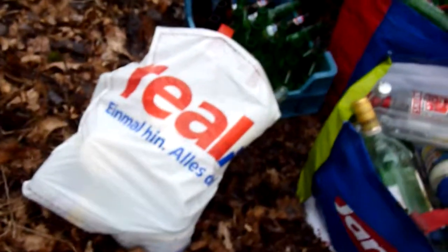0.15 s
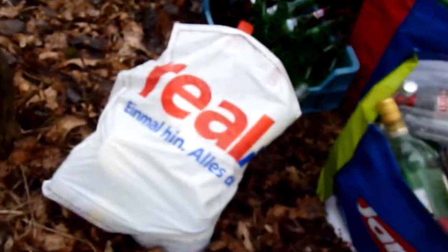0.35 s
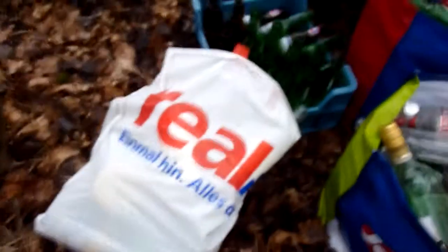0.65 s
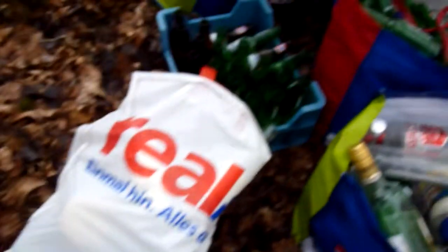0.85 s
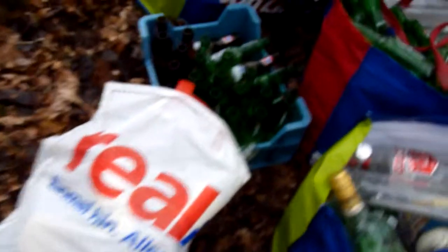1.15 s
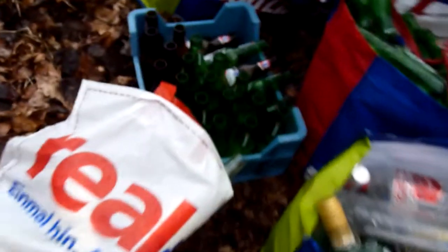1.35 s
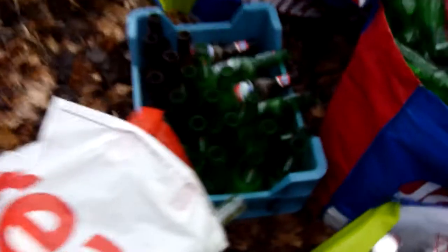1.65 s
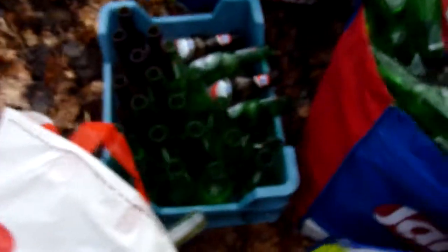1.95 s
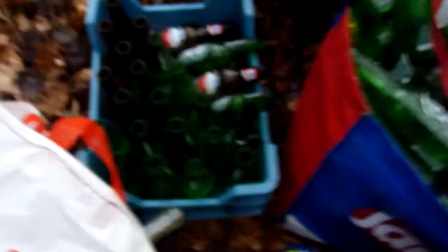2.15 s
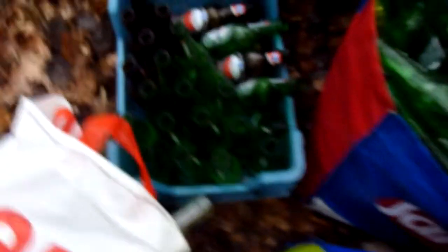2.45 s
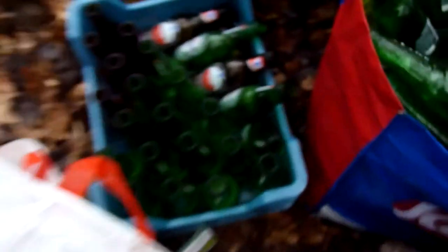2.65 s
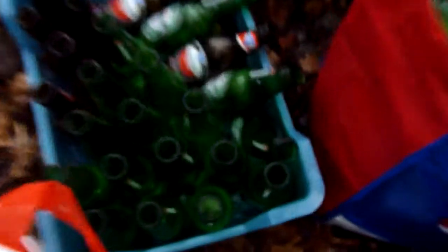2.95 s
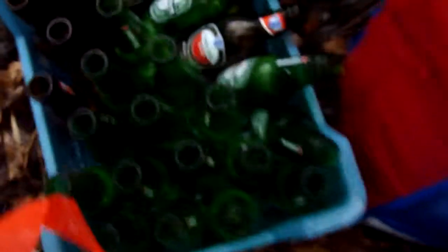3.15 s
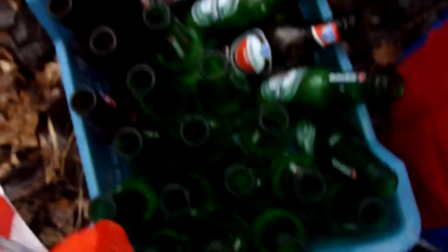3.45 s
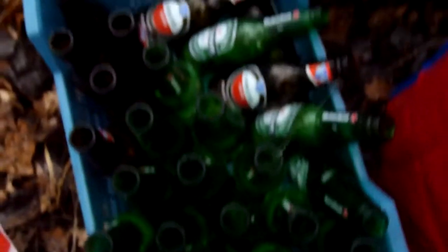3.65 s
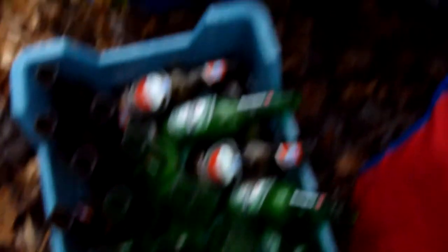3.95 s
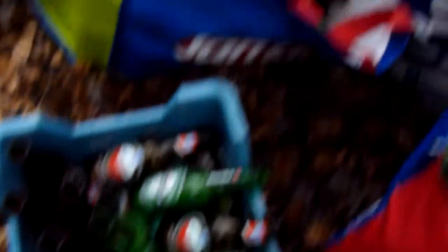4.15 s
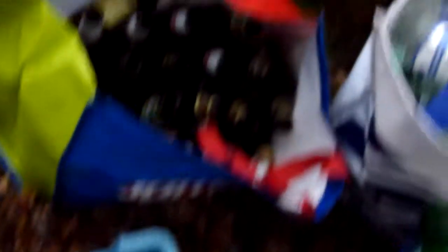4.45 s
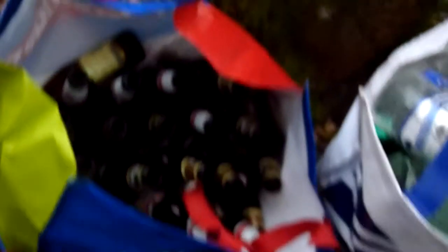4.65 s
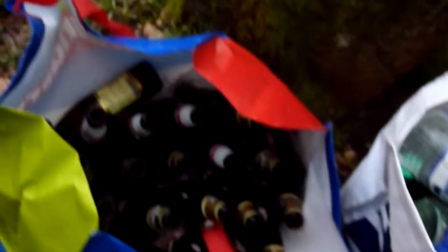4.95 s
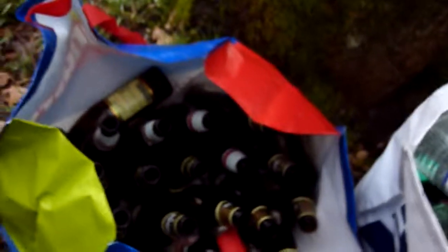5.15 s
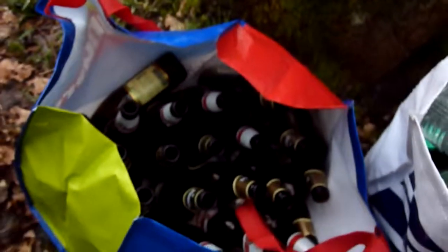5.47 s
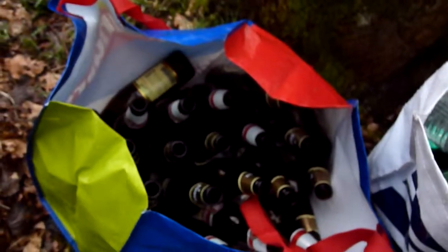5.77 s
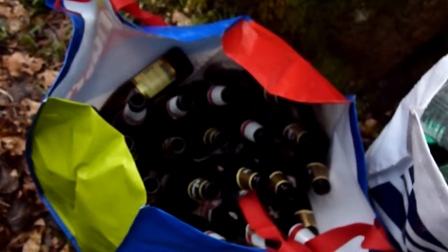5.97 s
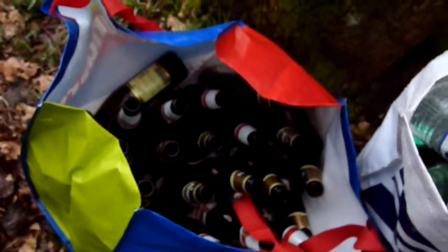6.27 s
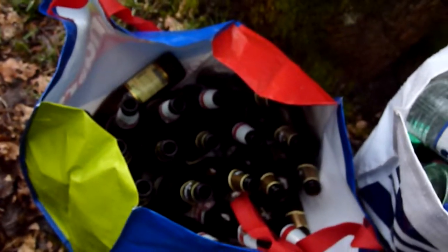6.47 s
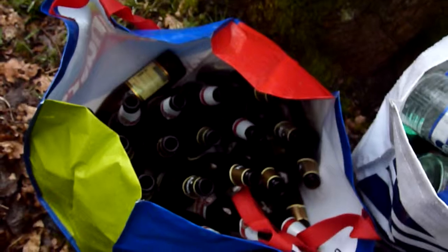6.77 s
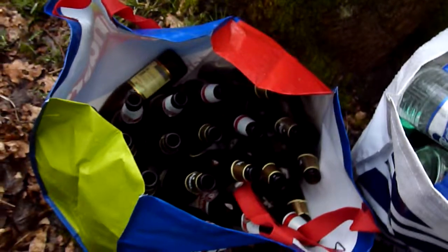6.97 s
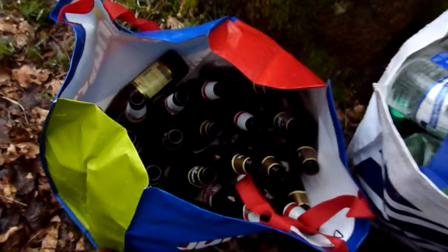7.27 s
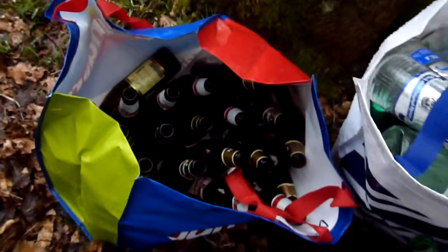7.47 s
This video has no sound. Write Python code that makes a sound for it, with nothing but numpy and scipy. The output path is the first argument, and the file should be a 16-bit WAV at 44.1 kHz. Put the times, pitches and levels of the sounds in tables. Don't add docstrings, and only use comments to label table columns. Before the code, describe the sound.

Light uneven rain and tree drips fall close by on plastic bags, bottles and dry leaves. Soft taps and crisp ticks come first, then a hard burst of drops just after one second. Near two and a half seconds a loud hollow bottle knock rings with a brief glass clink. Afterwards it thins to scattered patter with a few single thuds. Close handheld stereo microphone outdoors, with grainy hiss and a faint low murk behind.

```python
import sys
import numpy as np
from scipy import signal
from scipy.io import wavfile
from scipy.ndimage import uniform_filter1d

SR = 44100
rng = np.random.default_rng(int(sys.argv[2]) if len(sys.argv) > 2 else 0)


def output_pcm(signal):
    pcm = np.clip(np.atleast_2d(signal).T, -1, 1) * 32767
    wavfile.write(sys.argv[1], SR, np.round(pcm).astype(np.int16))


def magnitude_from_level(level_db):
    exponent = np.asarray(level_db, float) / 20
    return 10 ** exponent


N = 336042


def rms_one(x):
    return x / np.sqrt(np.mean(x ** 2) + 1e-20)


def peak_one(x):
    return x / np.max(np.abs(x))


def at_hz(points, hz):
    points = np.array(points)
    return np.interp(np.log(hz), np.log(points[:, 0]), points[:, 1])


def butter(order, edge_hz, kind, x):
    return signal.sosfilt(signal.butter(order, edge_hz, kind, fs=SR, output="sos"), x)


def drift(rate_hz):
    pole = np.exp(-80 * np.pi * rate_hz / SR)
    white = rng.standard_normal(N // 40 + 2002)
    slow = signal.lfilter([1], [1, -2 * pole, pole * pole], white)[2000:]
    return np.interp(np.arange(N) / 40, np.arange(len(slow)), rms_one(slow))


def fade(t60_s, size):
    return magnitude_from_level(-60 * np.arange(size) / SR / t60_s)


def ring(push, hz, t60_s):
    pole, angle = magnitude_from_level(-60 / (t60_s * SR)), 2 * np.pi * hz / SR
    return signal.lfilter([0, np.sin(angle)], [1, -2 * pole * np.cos(angle), pole * pole], push + 1e-18)


def add(out, s, sound, pan_db=0):
    start = round(s * SR)
    panned = sound * magnitude_from_level([[pan_db / 2], [-pan_db / 2]])
    out[:, start:start + sound.shape[-1]] += panned[:, :N - start]


def bands(spectrum, low_hz, high_hz):
    # frequency in Hz, side minus mid in dB.
    width = [(60, -22), (120, -21), (240, -21.5), (480, -18), (950, -15.5), (1890, -7.5), (3770, -1.5),
             (7520, -1.5), (15000, 6.5)]
    edges_hz = np.geomspace(low_hz, high_hz, round(3 * np.log2(high_hz / low_hz)) + 1)
    white = rng.standard_normal((2, 2, N))
    for k, (low, high) in enumerate(zip(edges_hz, edges_hz[1:])):
        mid, side = butter(2, [low, high], "band", white[k % 2])
        hz = np.sqrt(low * high)
        stereo = mid + magnitude_from_level(at_hz(width, hz)) * side * [[1], [-1]]
        yield hz, magnitude_from_level(at_hz(spectrum, hz)) * stereo


def rumble():
    # frequency in Hz, level in dB per Hz.
    murk_colour = [(12, -38), (20, -11), (70, 7.5), (150, -0.5), (344, -17), (400, -2), (520, -32),
                   (880, -120)]
    return magnitude_from_level(-61) * rms_one(sum(sound for hz, sound in bands(murk_colour, 28.0, 244.0)))


def birds():
    # start in seconds, length in seconds, start Hz, end Hz, roughness in Hz, level in dB.
    calls = [
        (3.49, 0.097, 3940, 4120, 200, -54),
        (3.74, 0.16, 3080, 3200, 60, -57),
        (6.522, 0.085, 4080, 4030, 220, -56),
    ]
    out = np.zeros((2, N))
    for s, length_s, start_hz, end_hz, rough_hz, db in calls:
        size = round(length_s * SR)
        blur = rms_one(butter(2, rough_hz, "low", rng.standard_normal((2, 16384))))[:, :size]
        tone = np.sin(2 * np.pi * np.cumsum(np.linspace(start_hz, end_hz, size)) / SR)
        add(out, s, magnitude_from_level(db) * tone * (0.27 + blur) * np.hanning(size) ** 0.5)
    return out


def far_drops(per_s, spread_db, t60_s):
    sizes = magnitude_from_level(2 * spread_db * np.minimum(rng.exponential(1, N), 2.5))
    born = rng.random(N) < per_s * magnitude_from_level(3 * drift(5)) / SR
    power = signal.lfilter([1], [1, -magnitude_from_level(-120 / (t60_s * SR))], sizes * born + 1e-18)
    return power / power.mean()


def plinks(per_s):
    sizes = magnitude_from_level(4.4 * np.minimum(rng.exponential(1, N), 2.5)) * rng.choice([-1, 1], N)
    born = rng.random(N) < per_s * magnitude_from_level(3 * drift(4)) / SR
    pitches_hz, dealt = np.geomspace(380.0, 1900.0, 10), rng.integers(0, 10, N)
    drops = sum(ring(sizes * born * (dealt == k), hz, 7.3 / hz) for k, hz in enumerate(pitches_hz))
    return rms_one(butter(2, [250.0, 2400.0], "band", drops))


def patter_levels():
    # time in seconds, level of the steady fall in dB.
    fall = [(0.0, -46), (.11, -53), (.45, -53.5), (.9, -52.5), (1.2, -49.5), (1.8, -49), (2.3, -48.5),
            (3.1, -50.5), (3.9, -52.5), (4.26, -51.5), (4.6, -46), (5.1, -51.5), (5.6, -52.5),
            (5.94, -54.5), (6.4, -50.5), (7.0, -52), (7.39, -53.5), (7.62, -49)]
    # middle in seconds, half length in seconds, dull dB, bright dB.
    stirs = [(0.29, 0.078, -44.5, -44.5), (0.635, 0.15, -45, -46.5), (0.743, 0.041, -56, -43.5),
             (1.015, 0.058, -50.5, -53), (1.36, 0.056, -46.5, -49), (1.557, 0.12, -60, -54),
             (1.92, 0.07, -48, -52.5), (2.135, 0.044, -44.5, -56), (2.473, 0.039, -56, -44),
             (2.584, 0.097, -41, -48), (2.66, 0.058, -42.5, -35.5), (2.789, 0.091, -41.5, -42.5),
             (3.032, 0.078, -51, -54.5), (4.387, 0.019, -48.5, -52), (4.806, 0.075, -70, -53.5),
             (6.46, .05, -69, -68.5), (6.97, 0.042, -66, -57), (7.285, 0.055, -61, -57.5)]
    bright_below_db, bright_follows = -2.5, 0.5
    time_s = np.arange(N) / SR
    s, db = np.transpose(fall)
    dull_db = np.interp(time_s, s, db)
    mean_db = dull_db.mean()
    bright_db = mean_db + bright_below_db + bright_follows * (dull_db - mean_db)
    power = magnitude_from_level(2 * np.array([dull_db, bright_db]))
    for middle_s, half_s, stir_dull_db, stir_bright_db in stirs:
        bell = np.exp(-((time_s - middle_s) / half_s) ** 2)
        power = power + magnitude_from_level(2 * np.array([[stir_dull_db], [stir_bright_db]])) * bell
    return np.sqrt(power)


def patter():
    # frequency in Hz, level in dB per Hz.
    hiss_colour = [(88, -34), (150, -4), (354, 0), (1440, -2), (2210, -9), (2580, 5), (2960, -14),
                   (3960, -8.5), (4630, -10), (5000, -9), (5740, -11), (13500, -19), (15800, -24)]
    split_hz = 2500
    dull_gain, bright_gain = patter_levels()
    both = far_drops(per_s=70.0, spread_db=4.0, t60_s=0.022)
    dull_drops = 0.27 * both + 0.085 * far_drops(per_s=90.0, spread_db=5.5, t60_s=0.041)
    bright_drops = 0.14 * both + 0.18 * far_drops(per_s=260.0, spread_db=3.0, t60_s=0.011)
    dull, bright = 0, 0
    for hz, sound in bands(hiss_colour, 162.0, 16260.0):
        flicker = magnitude_from_level(1.3 * drift(25.0))
        if hz < split_hz:
            dull = dull + sound * flicker
        else:
            bright = bright + sound * flicker
    dull = rms_one(dull * np.sqrt(0.5 + dull_drops))
    bright = rms_one(bright * np.sqrt(0.44 + bright_drops))
    dull = dull_gain * magnitude_from_level(0.72) * (dull + 0.25 * plinks(per_s=160.0))
    return dull + bright_gain * magnitude_from_level(4.5) * bright


def necks():
    # start in seconds, peak in dB, pitch in Hz, t60 in seconds.
    neck_rows = [
        (.1305, -35.5, 572, 0.11),
        (2.4168, -12.5, 537, 0.17),
        (4.559, -37.5, 565, 0.22),
    ]
    stopped_s = 0.12
    out, click = np.zeros((2, N)), np.eye(1, 8192)[0]
    choke = magnitude_from_level(-500.0 * np.maximum(np.arange(8192) / SR - stopped_s, 0))
    for s, db, hz, t60_s in neck_rows:
        air = ring(ring(click, hz, 0.015), hz, t60_s)
        add(out, s, magnitude_from_level(db) * peak_one(air) * choke, pan_db=1.0)
    return out


def clinks():
    # start in seconds, peak in dB.
    touches = [
        (2.4915, -29),
        (2.511, -35.5),
        (2.533, -32.5),
    ]
    # mode in Hz, level in dB, t60 in seconds.
    modes = [(2249, 4, 0.3), (2297, 3, 0.2), (2869, 1, 0.12), (3596, -7, 0.16), (4930, -11, .12),
             (5010, -12, .1), (6040, -12, .1), (6130, -8, 0.09), (6200, -9, 0.11), (6290, -9, 0.12),
             (6390, -11, 0.1), (8600, -18, .15), (10560, -19, 0.1), (11860, -10, 0.073)]
    held_s = 2.575
    out, click = np.zeros((2, N)), np.eye(1, 8192)[0]
    for (s, db), chance in zip(touches, rng.standard_normal((len(touches), len(modes), 2, 1))):
        glass = 0
        for k, ((hz, level_db, t60_s), luck) in enumerate(zip(modes, chance)):
            signs = np.array([[(-1) ** k], [1]])
            glass = glass + signs * magnitude_from_level(level_db + 2 * luck) * ring(click, hz, t60_s)
        add(out, s, magnitude_from_level(db) * glass, pan_db=11.0)
    return out * magnitude_from_level(-900.0 * np.maximum(np.arange(N) / SR - held_s, 0))


def bumps():
    # start in seconds, peak in dB, pitch in Hz, cycles of ring.
    hand_rows = [
        (1.127, -26.5, 134, 9),
        (1.299, -30, 121, 11),
        (2.413, -30, 171, 11),
        (2.445, -36.5, 110, 41),
        (2.482, -33, 130, 6),
        (2.578, -32.5, 140, 13),
        (4.037, -31, 182, 11),
        (4.641, -29, 157, 12),
        (5.283, -32.5, 91, 5.3),
    ]
    out, click = np.zeros((2, N)), np.eye(1, 8192)[0]
    soft = signal.lfilter(np.hanning(300) / 150, [1], click)
    shove = np.diff(soft, prepend=0)
    for s, db, hz, cycles in hand_rows:
        add(out, s, magnitude_from_level(db) * ring(shove * SR / hz / 6, hz, cycles / hz))
    return out


def pop():
    # start in seconds, peak in dB, pitch in Hz, cycles of ring, left-right dB.
    knocks = [
        (1.1125, -30.5, 340, 4, 0),
        (1.2998, -22, 262, 3, -0.5),
        (2.411, -26, 250, 3, 0),
        (2.4837, -1.5, 1300, 9.2, -1.5),
        (4.0367, -24.5, 530, 2.5, 1),
        (4.6424, -27.5, 250, 3, 0),
        (4.6932, -24, 910, 2.5, -1),
        (5.366, -36, 250, 4, 0),
        (6.8147, -30, 1900, 3, 3),
    ]
    # start in seconds, peak in dB, pitch in Hz.
    flutters = [(1.328, -34, 900), (1.335, -26, 1000), (1.3405, -27, 1250), (1.3505, -26.5, 1000),
                (1.3665, -31, 800), (1.374, -30, 1140), (1.379, -28, 980), (1.385, -36, 1000),
                (2.4925, -26, 700), (2.511, -32, 700), (2.522, -29, 700), (2.536, -30, 720),
                (2.554, -34, 750), (2.578, -36, 915), (2.468, -28, 2000)]
    flutter_cycles = 11
    out = np.zeros((2, N))
    clicks = np.eye(2, 4096)[::-1]
    for s, db, hz, cycles, pan_db in [*knocks, *[(*flap, flutter_cycles, 0) for flap in flutters]]:
        swell = ring(ring(clicks, hz, 3.7 / hz), hz, 3.7 / hz)
        add(out, s, magnitude_from_level(db) * peak_one(ring(swell, hz, cycles / hz)), pan_db)
    return out


def showers():
    # start in seconds, dull dB, bright dB, t60 in seconds.
    sheds = [(0.127, -29.5, -47, 0.05), (1.127, -21, -38, 0.027), (1.30, -20, -20.5, 0.029),
             (1.331, -44, -39, 0.14), (1.362, -41, -39, 0.06), (2.412, -22, -34.5, 0.17),
             (2.489, -39, -49, 0.4), (4.038, -23, -29, 0.031), (4.644, -32, -28.5, 0.038),
             (5.362, -39, -52, 0.081), (6.815, -30, -38.5, 0.044)]
    out, size = np.zeros((2, N)), 16384
    for (s, dull_db, bright_db, t60_s), water in zip(sheds, rng.standard_normal((len(sheds), 4, size))):
        grains = magnitude_from_level(rms_one(uniform_filter1d(water[3], size=88)))
        dull = butter(2, [450.0, 1900.0], "band", water[0] * grains)
        bright = butter(2, [2300.0, 13000.0], "band", (0.087 * water[0] + water[1:3]) * grains)
        spray = magnitude_from_level(dull_db) * rms_one(dull) + magnitude_from_level(bright_db) * rms_one(bright)
        add(out, s, spray * fade(t60_s, size))
    return out


def specks():
    # start in seconds, peak in dB, left-right dB.
    droplets = [(0.5531, -34, 3.5), (0.7023, -35, 1.5), (0.816, -33, 2.5), (1.0817, -28, 4),
                (1.3428, -40, 5), (1.6102, -37, 3.0), (1.8657, -42, -4), (2.1181, -37, -4),
                (2.2568, -42, -0.5), (2.4189, -36, 3.0), (2.4638, -34, 5), (2.4932, -30, 2.5),
                (4.0128, -38, -2.5), (4.2278, -28, -0.5), (4.7092, -41, 0.5), (5.4829, -38, 1.0),
                (5.7349, -36, 0), (5.7857, -33, -2.5), (5.8152, -38, 0.5), (5.9449, -33, 3.0),
                (6.0686, -34, 2.5), (6.3011, -33, 4), (6.5121, -34.5, 12), (6.7126, -40, 0.5),
                (6.9002, -34, -3), (6.9391, -32, 2.5), (7.1187, -32.5, -7), (7.3153, -40, -4),
                (7.5303, -38, -6)]
    hz = 14200
    out, envelope = np.zeros((2, N)), fade(0.002, size=1024) + 0.25 * fade(0.015, size=1024)
    for (s, db, pan_db), (shared, *own) in zip(droplets, rng.standard_normal((len(droplets), 3, 1024))):
        burst = (0.63 * shared + np.array(own)) * envelope
        burst = butter(2, 9500.0, "high", burst + 0.4 * ring(burst, hz, 6.0 / hz))
        add(out, s + 0.0014, magnitude_from_level(db + 3.0) * peak_one(burst), pan_db)
    return out


def ticks():
    # start in seconds, peak in dB, brightest Hz, left-right dB.
    splashes = [(0.028, -34.5, 3320, 3.5), (0.129, -30, 6040, 8), (0.4345, -29.5, 6530, 3),
                (0.8868, -29, 7760, 1), (1.0604, -26, 9600, 3), (1.1282, -16.5, 6440, 6),
                (1.2166, -23, 4040, -2), (1.2828, -20, 5600, 5), (1.289, -31, 7000, 4),
                (1.3009, -14.5, 6340, 7.5), (1.3625, -26.5, 5800, -3), (2.412, -25, 3530, 15),
                (2.43, -19.5, 7120, 8), (2.4411, -22.5, 6200, 18), (2.4831, -19, 3150, 4),
                (2.6746, -18.5, 5570, 3), (2.713, -22, 11830, 0), (2.7894, -21, 3840, -2),
                (2.827, -22.5, 6460, 0), (2.957, -28.5, 6900, 12), (3.0372, -24.5, 4150, 8.5),
                (3.0883, -29.5, 4100, 11), (4.0375, -39, 9900, 14), (4.0371, -24, 3480, -13),
                (4.176, -28, 6450, 12), (4.367, -25.5, 7500, 1), (4.6441, -23.5, 6160, 18),
                (4.9142, -27.5, 12130, -16), (6.5278, -30, 9900, 0), (6.836, -31, 5900, 1)]
    # start in seconds, peak in dB, left-right dB.
    snaps = [(0.168, -31, 0), (0.6139, -35, -16), (1.3735, -29.5, -11), (1.4886, -33.5, 11),
             (1.534, -35.5, 5), (1.6233, -31.5, 4), (1.691, -31.5, 2), (3.253, -34.5, 4), (3.331, -35.5, 9),
             (3.378, -37, 1), (3.471, -37, 14), (3.6278, -35, 11), (3.636, -28.5, -2), (4.303, -33.5, 0),
             (4.3317, -33, 1), (4.5574, -34, 2), (4.7682, -31.5, 3), (5.0995, -34.5, -10),
             (5.36, -35.5, -22), (5.7688, -31.5, 7.5), (6.082, -38, 2), (6.0903, -34, 2),
             (6.6357, -33.5, -4), (7.204, -34.5, 0), (7.2238, -35.5, 8)]
    # start in seconds, peak in dB, left-right dB.
    spits = [(0.103, -34, -5), (0.3298, -35, 1), (0.84, -31, 3), (0.9784, -29.5, 1), (1.581, -32, -1),
             (1.8968, -34, 11), (2.1777, -38, 7), (2.9634, -34, 2), (4.5101, -35, -3), (5.1974, -47, -27),
             (5.3065, -32.5, -1), (5.3295, -33, -4), (5.3783, -33.5, -10), (5.506, -35, 6),
             (5.9462, -37.5, -10), (6.121, -30, 4), (6.193, -38, -12), (6.3748, -38, -9), (6.4532, -34, -3),
             (6.6151, -32, 4), (6.9513, -39, 9), (7.2715, -31.5, 8), (7.3364, -32.5, -5)]
    # start in seconds, peak in dB, left-right dB.
    cracks = [(0.0528, -37, 4.0), (1.2476, -34.5, 9), (1.334, -31, -4), (1.6082, -32, 0),
              (1.6636, -44, 1.5), (1.7168, -36.5, -1.0), (1.8647, -38, 6), (1.916, -36, 7),
              (1.963, -39, -3), (2.1271, -36, 2.0), (2.9926, -37, 7), (3.0664, -33, 1), (3.162, -39.5, 2.5),
              (3.426, -37, 1.0), (4.0335, -31, -4), (4.3475, -37, 2.0), (4.5027, -35, -0.5),
              (4.7434, -36, -1), (4.8678, -42, 1.5), (5.219, -43, 1.5), (5.4829, -37.5, -2),
              (5.5893, -43, 1.0), (5.6426, -47, -2), (5.8152, -40, 1.5), (6.5126, -36, 8),
              (6.783, -35, 2.5), (7.12, -38, -2.0)]
    rows = [*splashes]
    for group, brightest_hz in [(snaps, 6200), (spits, 13200), (cracks, 4500)]:
        rows += [(s, db, brightest_hz, pan_db) for s, db, pan_db in group]
    out, envelope = np.zeros((2, N)), fade(0.00099, size=2048) + 0.18 * fade(0.032, size=2048)
    for (s, db, hz, pan_db), (shared, *own) in zip(rows, rng.standard_normal((len(rows), 3, 2048))):
        spray = (1.13 * shared + np.array(own)) * envelope
        spray = butter(2, [1700.0, 11500.0], "band", spray + 0.5 * ring(spray, hz, 4.7 / hz))
        add(out, s, magnitude_from_level(db + 7.5) * peak_one(spray), pan_db)
    return out


def ground(x):
    out = x.copy()
    dull = butter(1, 5000.0, "low", x)
    for lag_s, db in [(0.0021, -19), (0.0047, -18)]:
        lag = round(lag_s * SR)
        out[:, lag:] += magnitude_from_level(db) * dull[::-1, :-lag]
    return out


def thuds():
    # start in seconds, peak in dB, sheet pitch in Hz, cycles of ring.
    heavy = [(0.0286, -26, 820, 4.9), (0.1144, -28, 1200, 2.8), (0.1286, -26.5, 905, 2.1),
             (0.33, -20.5, 610, 9.7), (0.4346, -29, 1200, 7), (0.5449, -28.5, 670, 6.3),
             (1.1284, -13, 1040, 1.1), (1.2178, -12.5, 1020, 4.2), (1.282, -15.5, 910, 1.1),
             (1.3003, -13, 805, 4.7), (1.3019, -16, 1030, 3.4), (1.311, -30, 850, 7.2),
             (1.3455, -27, 940, 6), (1.674, -25, 523, 1.6), (1.7176, -27.5, 1120, 1.5),
             (1.8921, -28, 1160, 2.5), (2.117, -26.5, 1410, 13), (2.4113, -15, 1450, 11),
             (2.4885, -16.5, 1200, 11), (2.6198, -26, 680, 2.5), (2.6978, -24, 705, 4),
             (2.7127, -22.5, 820, 1.6), (2.7906, -24.5, 550, 1), (2.827, -24.5, 1450, 2.1),
             (2.8921, -21.5, 786, 1.3), (3.0366, -28, 840, 8.3), (4.037, -21, 776, 1),
             (4.6424, -14, 880, 4.5), (4.6573, -26, 990, 7.1), (4.648, -21.5, 950, 7.3),
             (6.814, -22.5, 980, 4.9)]
    # start in seconds, peak in dB, sheet pitch in Hz.
    taps = [(0.283, -32, 900), (0.617, -30, 900), (0.64, -31, 1200), (0.648, -28, 1300), (0.657, -32, 1000),
            (0.688, -36, 1500), (0.766, -34, 1400), (2.751, -29, 600), (2.769, -27, 700), (2.806, -31, 800),
            (0.258, -29.5, 537), (0.412, -30.5, 1500), (0.5, -33, 1040), (0.5588, -36, 610),
            (0.63, -30, 476), (0.7048, -30, 640), (1.0597, -33, 1540), (1.758, -37, 714),
            (2.8484, -31, 850), (3.088, -28.5, 940), (3.6427, -27.5, 790), (3.6968, -31.5, 1180),
            (3.889, -34, 1060), (3.9477, -32, 1220), (4.1746, -38, 750), (4.347, -33.5, 600),
            (4.3922, -41, 800), (4.56, -39, 750), (6.3628, -35.5, 910), (5.362, -26.5, 640),
            (5.3797, -29, 515), (5.5691, -28, 596), (5.7358, -35, 1040), (6.041, -33, 537),
            (6.09, -29.5, 1590), (6.6354, -30, 820), (6.986, -34, 754), (7.2481, -37.5, 780),
            (7.2712, -35.5, 500), (7.33, -29, 1060)]
    # start in seconds, peak in dB, sheet pitch in Hz.
    pats = [(0.2, -29, 441), (0.911, -34, 482), (1.532, -40, 910), (1.794, -34, 565), (1.954, -41, 398),
            (2.01, -35, 366), (2.954, -31, 842), (3.134, -37, 856), (3.329, -33, 816), (3.471, -38, 396),
            (3.977, -35, 856), (4.154, -31, 1460), (4.227, -28, 1380), (4.912, -40, 1200),
            (5.149, -32, 861), (5.196, -43, 530), (5.305, -39, 991), (5.439, -43, 509), (5.503, -37, 1510),
            (5.677, -47, 807), (6.022, -41, 585), (6.511, -29, 1210), (6.613, -34, 713), (6.886, -41, 363),
            (7.203, -37, 511)]
    light_cycles = 4.3
    light = [*taps, *[(s + 0.0015, db - 5.5, hz) for s, db, hz in pats]]
    drops = [*heavy, *[(*row, light_cycles) for row in light]]
    out = np.zeros((2, N))
    shakes = rng.standard_normal((len(drops), 3, 2048))
    for (s, db, hz, cycles), (shake, *own) in zip(drops, shakes):
        push = 0.052 * (shake + 0.15 * np.array(own)) * fade(0.031, size=2048)
        push[:, 0] = 1
        driven = ring(push, hz, 2.0 / hz)
        body = ring(driven, hz, np.clip(cycles, 1.2, 30) / hz)
        dent_hz, dent_t60_s = 2.13 * hz, 0.76 / hz
        dent = ring(ring(push, dent_hz, dent_t60_s), dent_hz, dent_t60_s)
        sheet = peak_one(body) - 0.5 * peak_one(dent)
        add(out, s - 0.0004, magnitude_from_level(db + 2.5) * peak_one(sheet), pan_db=0.54 * np.tanh(shake[0]))
    return out


def scene():
    near = thuds() + ground(ticks() + specks()) + showers() + pop()
    near = butter(2, 170.0, "high", near)
    bottles = necks() + clinks() + bumps()
    return near + bottles + birds() + patter() + rumble()


def band_limit(x):
    return signal.sosfilt(signal.butter(12, 16470, fs=SR, output="sos"), x)


def record(dry):
    # centre in Hz, width in Hz, depth in dB.
    cuts = [(2596, 1036, -33), (4607, 1110, -35), (7870, 410, -23)]
    x = dry
    for hz, width_hz, db in cuts:
        middle, depth = -2 * np.cos(2 * np.pi * hz / SR), magnitude_from_level(db / 2)
        k = np.tan(np.pi * width_hz / SR) * depth
        zeros = [1 + k * depth, middle, 1 - k * depth]
        poles = [1 + k / depth, middle, 1 - k / depth]
        x = signal.lfilter(zeros, poles, x)
    x = x + 0.046 * butter(1, 2500.0, "high", x) * [[1], [-1]]
    x = signal.sosfilt(signal.cheby2(7, 24, 15950, fs=SR, output="sos"), x)
    return band_limit(x)


dry = scene()
out = record(dry)
output_pcm(out)
```